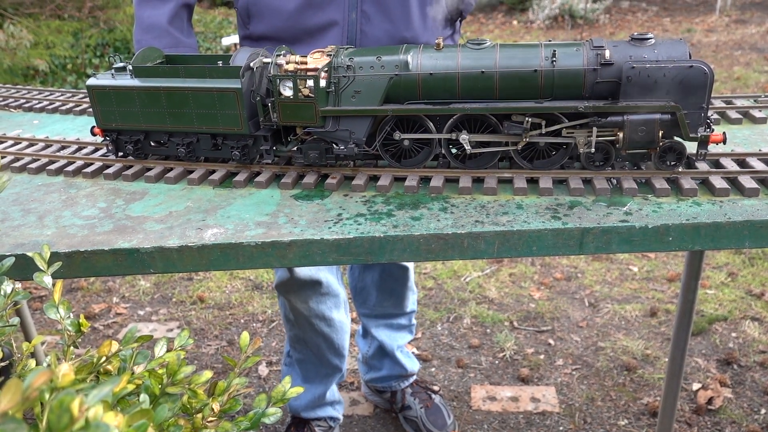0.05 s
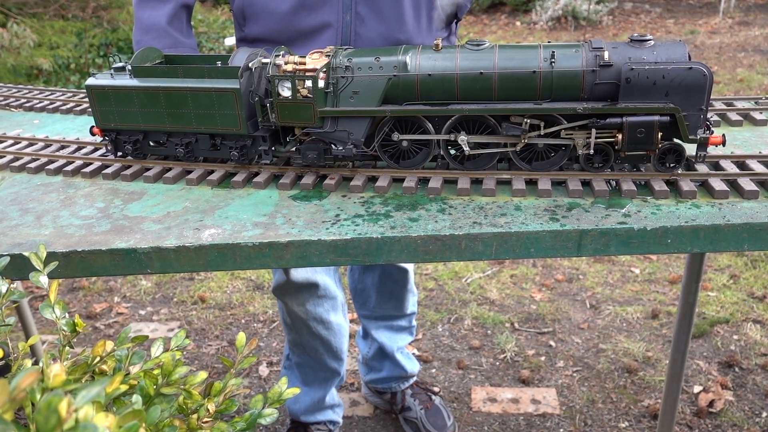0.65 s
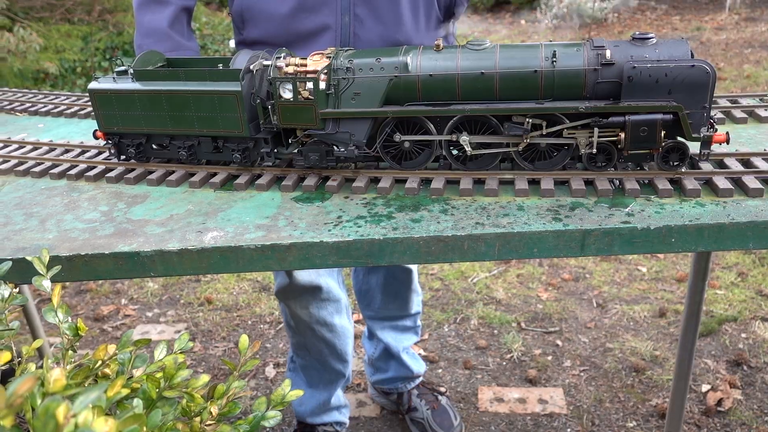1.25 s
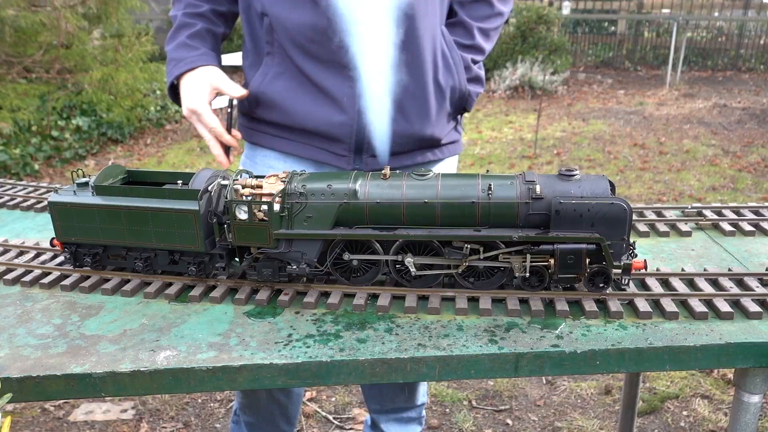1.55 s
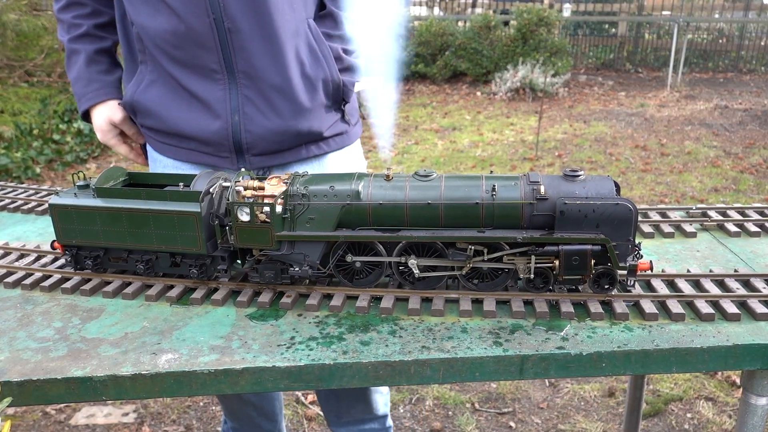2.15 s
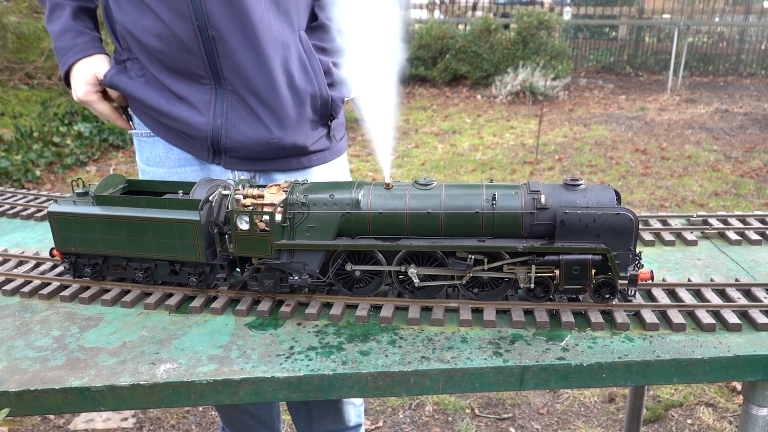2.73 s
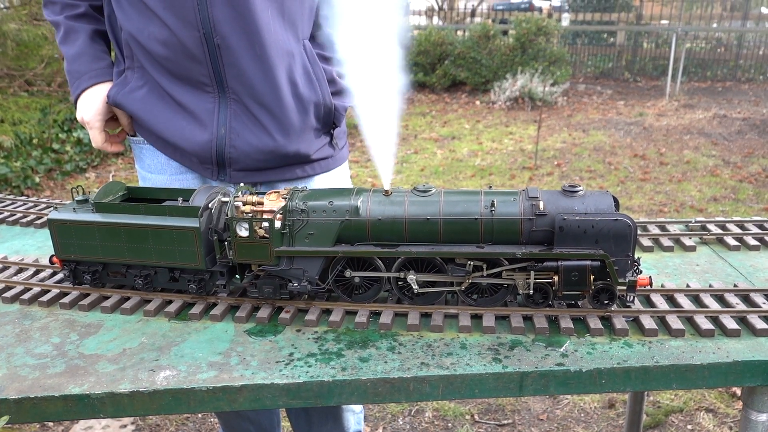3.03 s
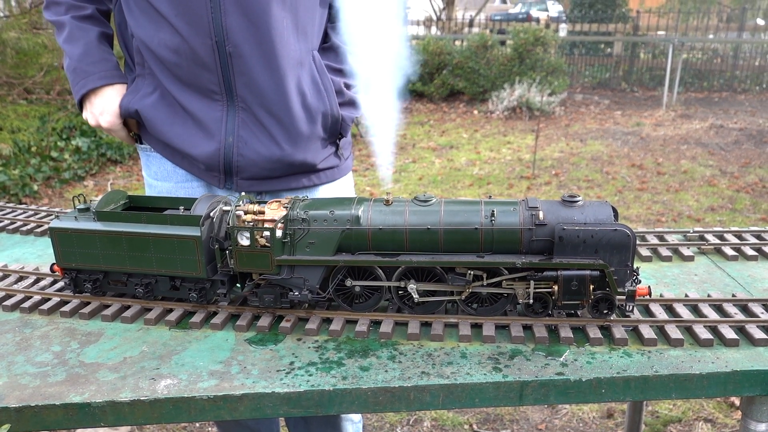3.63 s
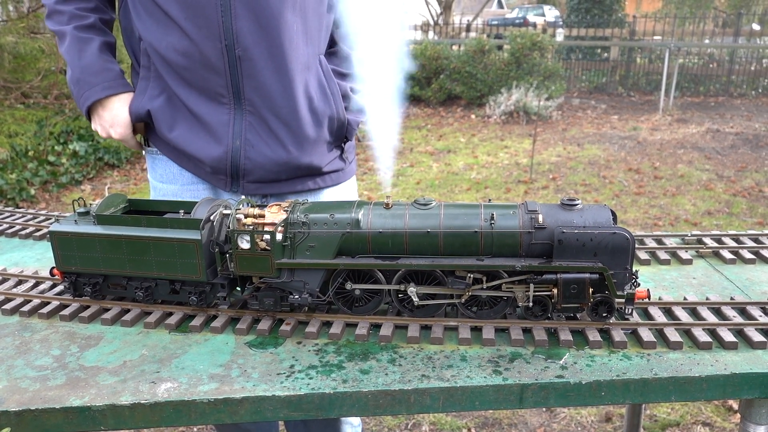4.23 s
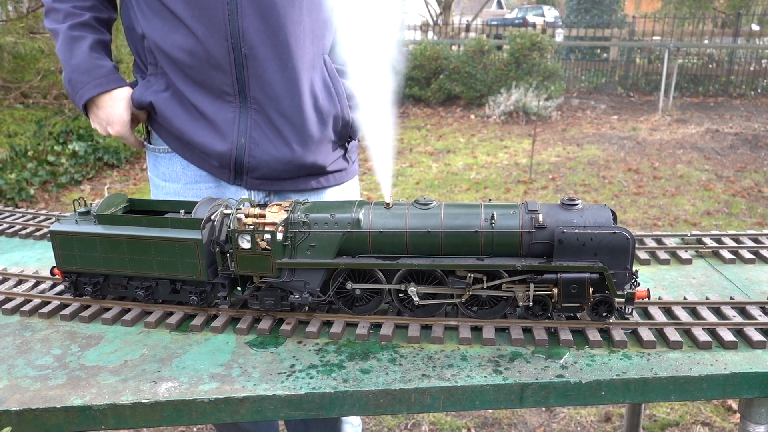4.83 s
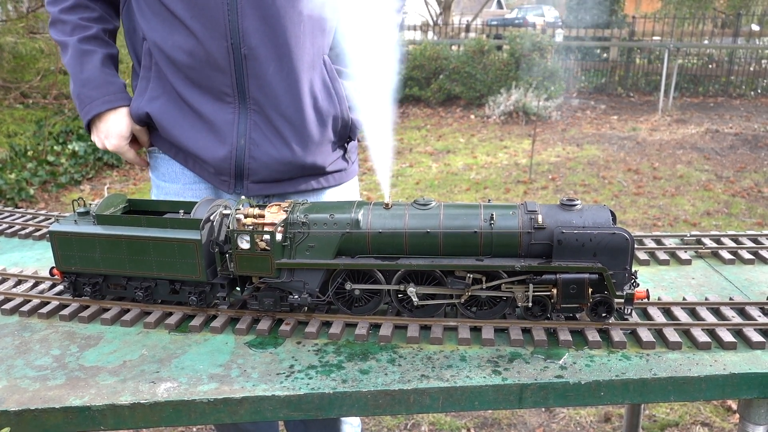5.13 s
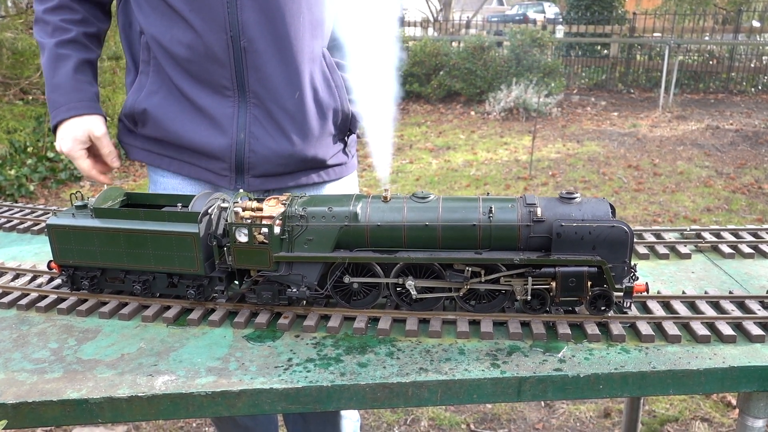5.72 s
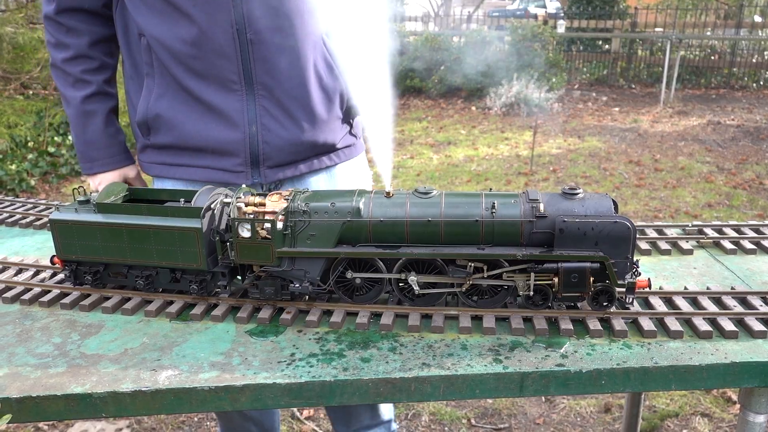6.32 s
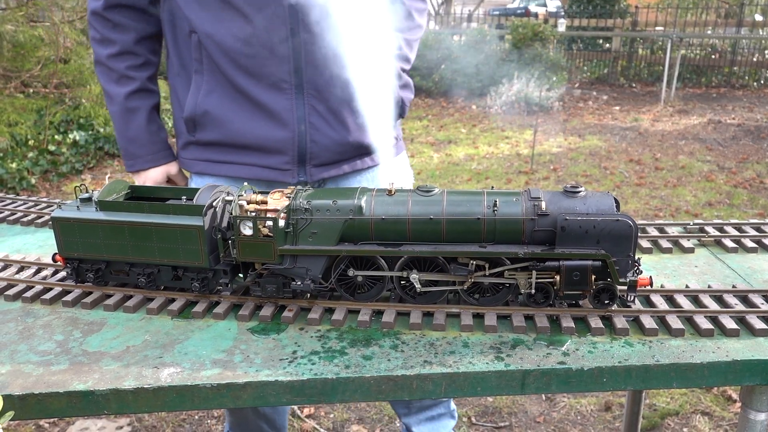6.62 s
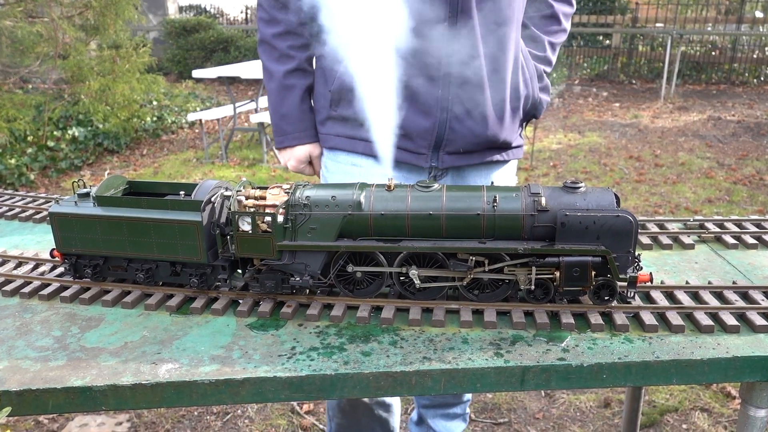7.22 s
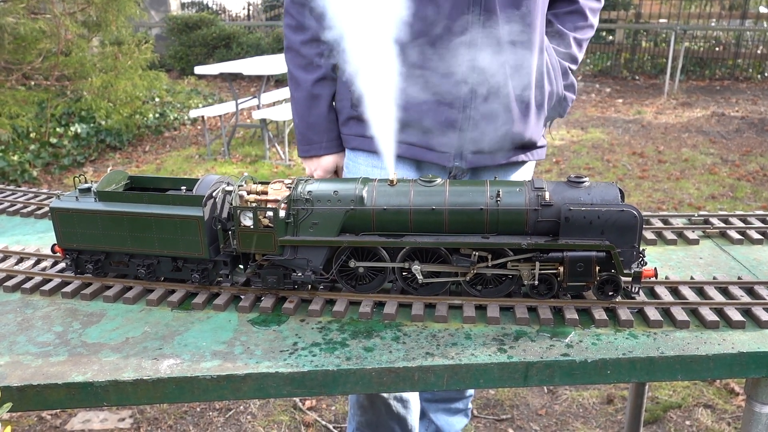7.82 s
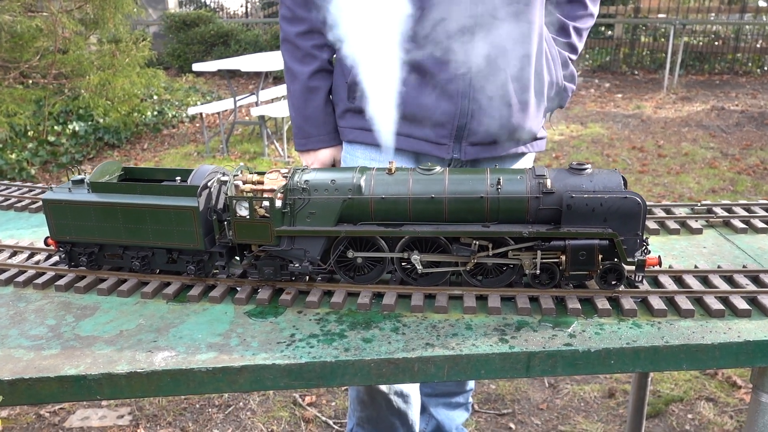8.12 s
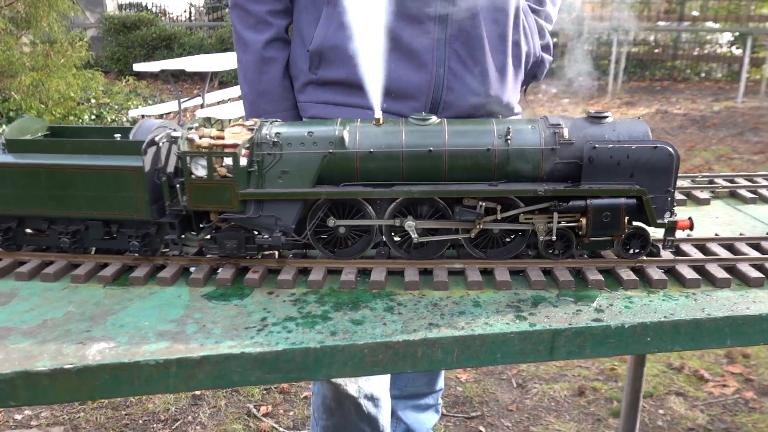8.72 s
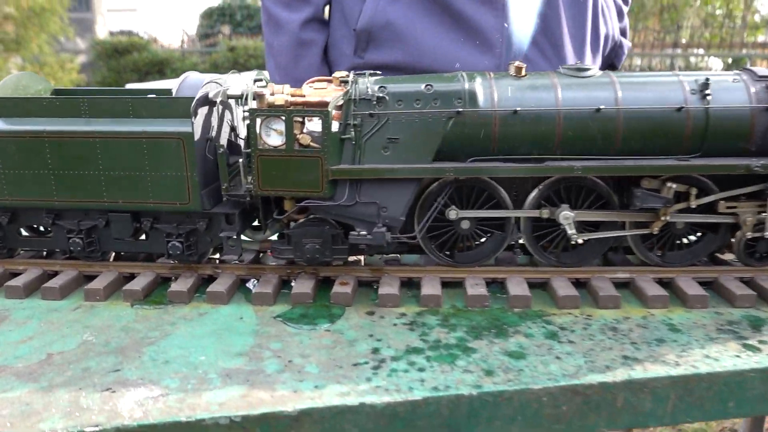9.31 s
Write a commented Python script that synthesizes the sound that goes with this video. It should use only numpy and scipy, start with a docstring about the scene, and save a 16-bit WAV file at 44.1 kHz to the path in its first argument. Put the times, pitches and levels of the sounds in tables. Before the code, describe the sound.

A model steam locomotive hisses softly, then its safety valve blows off in a loud, bright, pulsing jet that spits water.

```python
"""A live-steam model locomotive stands on a raised garden track, a little way from a stereo microphone.
First its blower hisses up the chimney over the murmur of the fire. At 1.6 s the level dips briefly,
and then the safety valve is blowing off: a bright, wet jet that spits drops of water. A fuller hiss
surges in about three times a second, evenly at first, slowing and stuttering from about 7 s.
Near the end the microphone moves in closer."""
import sys
import numpy as np
from scipy import signal
from scipy.fft import rfft, irfft, next_fast_len
from scipy.io import wavfile
from scipy.ndimage import uniform_filter1d, map_coordinates

SR = 44100
rng = np.random.default_rng(int(sys.argv[2]) if len(sys.argv) > 2 else 0)


def master_out(mix):
    """Clip the mix to full scale and print it as 16-bit PCM to the path in sys.argv[1]."""
    frames = np.transpose(np.atleast_2d(mix))
    ceiling = np.clip(frames, -1, 1)
    pcm = np.round(ceiling * 32767).astype(np.int16)
    wavfile.write(sys.argv[1], SR, pcm)


N = 417186
T = np.arange(N) / SR
DIP_S = 1.584  # the brief dip in level between blower and safety valve


def undb(db):
    """Decibels to gain."""
    return 10 ** (np.asarray(db) / 20)


def unit(x):
    """Scale to rms 1."""
    return x / np.sqrt(np.mean(x ** 2))


def curve(table):
    """A (t/s, value) table, sample by sample."""
    return np.interp(T, *np.transpose(table))


def highpass(x, hz, order=2):
    """Take away what lies below hz."""
    return signal.sosfilt(signal.butter(order, hz, "high", fs=SR, output="sos"), x)


def delay(x, lag_ms):
    """Hear a sound a little later; the lag may move."""
    return map_coordinates(x, [np.arange(N) - lag_ms * SR / 1000], order=3)


def colour(x, spectrum, resonances=()):
    """Causal filter: a (f/Hz, level/dB) spectrum with resonances standing on it."""
    size = next_fast_len(N + 8192, True)
    f = np.maximum(np.arange(size // 2 + 1) * SR / size, 1)
    hz, db = np.transpose(spectrum)
    peaks = 1 + sum(undb(level) ** 2 / (1 + 2 * ((f - centre) / width) ** 2) ** 2
                    for centre, width, level in resonances)
    gain = undb(np.interp(np.log(f), np.log(hz), db)) * np.sqrt(peaks)
    cepstrum = irfft(np.log(gain), size)
    cepstrum[1:size // 2] *= 2  # fold onto positive time for minimum phase
    cepstrum[size // 2 + 1:] = 0
    return irfft(rfft(x, size) * np.exp(rfft(cepstrum)), size)[..., :N]


def walk(rate_hz):
    """Random wavering of rms 1: values held for 1 / rate_hz seconds and smoothed twice."""
    hold = int(SR / rate_hz)
    held = rng.standard_normal(8192)[np.arange(N) // hold]
    return unit(uniform_filter1d(uniform_filter1d(held, hold), hold))


def turbulence(spectrum, resonances=(), *, apart_db):
    """Flow noise of rms 1 at the microphone's two ports: a shared part, and one each hears alone."""
    white = rng.standard_normal(N) + undb(apart_db) * rng.standard_normal((2, N))
    return unit(colour(white, spectrum, resonances))


def ripple(cycles):
    """The shape of a pressure wave only a few cycles long."""
    return lambda t, hz: -np.sin(2 * np.pi * hz * t) * np.exp(-(2 * hz * t / cycles) ** 2)


def shock(t, hz):
    """Pressure builds, snaps over into suction and relaxes."""
    return -np.tanh(t / 4e-5) * np.exp(-2 * np.pi * hz * np.abs(t))


def bursts(rows, shape):
    """Short pressure waves from (t/s, level/dB, f/Hz) rows; shape(t, hz) draws one around t = 0."""
    out = np.zeros(N)
    for s, db, hz in rows:
        middle, reach = int(s * SR), int(6 * SR / hz)
        i = np.arange(max(middle - reach, 0), min(middle + reach, N))
        wave = shape(T[i] - s, hz)
        out[i] += undb(db) * wave / (np.abs(wave).max() + 1e-9)
    return out


def spray(count, span_s, db, spread_db, hz, octaves):
    """Random (t/s, level/dB, f/Hz) rows: many small drops and a few larger ones."""
    when, size, pitch = rng.random((count, 3)).T
    times = span_s[0] + when * (span_s[1] - span_s[0])
    levels = db + spread_db * np.minimum(-np.log(1 - size), 4)
    return np.column_stack([times, levels, hz * 2 ** (octaves * (2 * pitch - 1))])


def garden_scatter(x, level_db=-16, t60_s=0.058):
    """Track bed and garden scatter back a short diffuse tail, unrelated at the two ports."""
    t = T[:SR // 10]
    tail = rng.standard_normal((2, len(t))) * np.exp(-np.log(1000) * t / t60_s)
    tail /= np.sqrt(np.sum(tail ** 2, axis=1, keepdims=True))
    return signal.fftconvolve(x[None], tail, axes=1)[:, :N] * undb(level_db)


# a hum coming and going behind the blower: t/s, level/dB
HUM_LEVEL = [(0, -64), (.15, -57), (.55, -57), (.7, -67), (1.3, -68), (1.45, -55)]

def hum():
    """A faint low tone in the background, wavering in pitch and level."""
    pitch_hz = 183 + 7 * walk(30)
    return np.sin(2 * np.pi * np.cumsum(pitch_hz) / SR) * undb(curve(HUM_LEVEL) + 2.5 * walk(14))


# low knocks: t/s, level/dB, f/Hz
SOFT_BUMPS = [(.812, -34.5, 185), (1.86, -28, 603), (2.16, -48, 190), (3.29, -41, 240)]

def bumps():
    """A few soft, dull bumps, alike at both ports."""
    return bursts(SOFT_BUMPS, ripple(cycles=1.3))


# spectrum of the fire's murmur: f/Hz, level/dB
FIRE_SPECTRUM = [(15, -64), (25, -43), (133, -14.5), (173, -19), (211, -7), (474, 0), (541, -2), (608, 2.5),
                 (753, 2.5), (889, -6), (981, -3.5), (1070, -37), (1300, -10), (1690, -32), (2860, -120)]

def fire(level_db=-42.5):
    """The draught murmurs steadily through the fire and tubes."""
    waver_db = 0.7 * walk(9)
    return turbulence(FIRE_SPECTRUM, apart_db=-24) * undb(level_db + waver_db)


# strength of the blower: t/s, level/dB
BLOWER_LEVEL = [(0, -22.5), (.3, -24), (.8, -23.5), (1.07, -22.5), (1.28, -24.5), (1.56, -23.5)]
# spectrum of its hiss: f/Hz, level/dB
BLOWER_SPECTRUM = [(200, -39), (1000, -10.5), (2000, -9.5), (3500, -5.5), (4500, 0), (6500, 0.5),
                   (8000, -3.5), (10000, -4.5), (11800, -4), (13700, -14), (15000, -5), (16000, -25)]
# resonances of blower and chimney: f/Hz, width/Hz, level/dB relative to the hiss
CHIMNEY_MODES = [(4770, 220, 1), (5450, 350, 7), (5740, 270, 13.5), (6200, 300, -1)]
# one sharp wet tick and two softer ones: t/s, level/dB, f/Hz
WET_TICKS = [(.356, -4.2, 8500), (1.07, -12, 9000), (1.461, -13, 3400)]
# shading of the blower at the left port: f/Hz, level/dB
LEFT_SHADE_BLOWER = [(300, -5), (1800, -1.5), (2900, -2.5), (3700, -2), (5200, -7), (6300, -6.5),
                     (7700, -2), (9000, -1), (12000, -3), (14000, 1)]

def blower():
    """A thin jet rings the chimney and water in the steam ticks; the left port is shaded and late."""
    hiss = turbulence(BLOWER_SPECTRUM, CHIMNEY_MODES, apart_db=-4.5)
    hiss *= undb(curve(BLOWER_LEVEL) + 0.9 * walk(69.9))
    fine = spray(90, (0, DIP_S), db=-19.5, spread_db=1.8, hz=6500, octaves=0.8)
    coarse = spray(12, (0, DIP_S), db=-12.5, spread_db=1.3, hz=8100, octaves=0.25)
    ticks = bursts(WET_TICKS, ripple(cycles=2.3)) + bursts([*fine, *coarse], ripple(cycles=0.7))
    left, right = hiss + ticks
    return np.array([delay(colour(left, LEFT_SHADE_BLOWER), lag_ms=0.029), right])


# the largest drops bursting in the valve's jet: t/s, level/dB, corner f/Hz
BIG_DROPS = [(1.814, -10, 2380), (2.282, -11.5, 800), (2.924, -6, 2800), (3.372, -8.5, 2600),
             (3.634, -8.5, 2200), (3.701, -12.5, 800), (5.142, -13, 700), (5.668, -16, 700),
             (6.147, -12, 1800), (6.24, -9, 2600), (6.639, -15, 700), (6.695, -18.5, 600), (6.74, -17, 500),
             (6.944, -7, 2000), (7.064, -13, 1000), (7.849, -10.5, 1500), (8.185, -7, 2000),
             (8.213, -9, 2000), (8.478, -8, 3000), (8.665, -12.5, 700), (8.846, -7, 2800),
             (8.977, -11, 1000), (9.007, -10, 1400), (9.116, -19, 500), (9.221, -11.5, 900),
             (9.399, -5, 2840)]

def drops(closeness, near_db=3, gush_db=2):
    """Water carried over with the steam bursts: big pops over gushes of small ones, louder close up."""
    span_s = (DIP_S, N / SR)
    crackle = spray(600, span_s, db=-22.5, spread_db=2.2, hz=2400, octaves=0.61)
    spits = spray(30, span_s, db=-14, spread_db=0.5, hz=3800, octaves=0.5)
    plops = spray(40, span_s, db=-28, spread_db=1.6, hz=650, octaves=0.6)
    small = bursts([*crackle, *spits, *plops], shock) * undb(near_db * closeness + gush_db * walk(14))
    return highpass(bursts(BIG_DROPS, shock) + small, 435)


def beats(first_s, gap_s, slowing, count):
    """Times of a beat whose every gap is longer than the last by the share `slowing`."""
    return first_s + np.append(0, np.cumsum(gap_s * (1 + slowing) ** np.arange(count - 1)))


# spectrum of the surging hiss: f/Hz, level/dB
SURGE_SPECTRUM = [(500, -69.5), (1200, -21.5), (2000, -6.5), (3000, -1.5), (4000, 0.5), (5500, 0.5),
                  (7000, -1), (8000, -4.5), (10000, -1.5), (12000, -8.5), (15500, -13)]
# its resonance: f/Hz, width/Hz, level/dB relative to the hiss
OUTLET_MODE = [(3970, 260, 1.5)]
# stutters of steam between and on top of the surges: middle t/s, length/s, level/dB
STEAM_STUTTERS = [(1.893, 0.089, -23.5), (5.706, .035, -22), (6.66, 0.2, -24), (7.321, .05, -21),
                  (7.79, 0.055, -21.5), (7.946, 0.049, -20), (8.13, 0.055, -20), (8.598, 0.22, -22.5),
                  (8.785, 0.12, -18), (9.137, 0.084, -21.5)]

def surges(level_db=-20.2, rise_s=0.024, fall_s=0.045, even_length_s=0.17, slower_length_s=0.13):
    """A fuller hiss rises quickly, holds and falls away: evenly at first, then slowing and stuttering."""
    even = beats(first_s=1.693, gap_s=0.3553, slowing=0, count=14)
    slower = beats(first_s=6.795, gap_s=0.326, slowing=0.093, count=7)
    rows = [(s, length, level_db + 0.6 * rng.standard_normal())
            for times, length in [(even, even_length_s), (slower, slower_length_s)] for s in times]
    opening = np.zeros(N)
    for s, length, db in [*rows, *STEAM_STUTTERS]:
        rising = (T - s + length / 2) / rise_s
        falling = (s + length / 2 - T) / fall_s
        gate = np.clip(0.5 + np.minimum(rising, falling), 0, 1)
        opening = np.maximum(opening, undb(db) * gate)
    hiss = turbulence(SURGE_SPECTRUM, OUTLET_MODE, apart_db=-14.5)
    flutter_db = 0.75 * walk(55) + 0.32 * walk(14)
    return hiss * opening * undb(flutter_db)


# spectrum of the valve's jet and plume: f/Hz, level/dB
JET_SPECTRUM = [(25, -58), (80, -41), (130, -32), (185, -22.5), (300, -17.5), (600, -7.5), (1100, -6),
                (2000, -2.5), (3500, 2), (5500, 1), (7500, 1.5), (10000, 4.5), (13400, 3), (15600, -5)]
# hollow resonance in the plume: f/Hz, width/Hz, level/dB relative to the roar
PLUME_MODE = [(637, 98, -1.5)]

def valve_jet(closeness, jet_db=-20.5, fade_in_s=0.064, sizzle_fade_db_per_s=0.3):
    """A bright jet fades in just after the dip; its sizzle slowly wanes, its wider plume sputters."""
    fading_in = np.clip(1 - (T - DIP_S) / fade_in_s, 0, 1)
    level_db = jet_db + 2.1 * closeness - 7 * fading_in
    hiss = highpass(turbulence(JET_SPECTRUM, apart_db=-5.5), 1460)
    sizzle = turbulence([(12000, -43), (13500, -6), (14500, 1), (15600, 1), (17000, -40)], apart_db=-10)
    sizzle *= undb(-4.5 - sizzle_fade_db_per_s * (T - DIP_S) - 2.5 * closeness)
    plume = turbulence(JET_SPECTRUM, PLUME_MODE, apart_db=-5.5)
    left, right = signal.sosfilt(signal.butter(2, 1700, fs=SR, output="sos"), plume)
    roar = np.array([left, delay(right, lag_ms=0.22)])
    flutter_db = 0.59 * walk(13) + 0.88 * walk(130)
    sputter_db = 1.25 * walk(18) + 1.23 * walk(170)
    return (hiss + sizzle + roar * undb(sputter_db - 0.83)) * undb(level_db + flutter_db)


# the microphone's way in to the engine: t/s, closeness (0 standing back, 1 close up)
MIC_APPROACH = [(2.5, 0), (3.6, 0.16), (7.9, 0.18), (8.85, 0.35), (9.15, 0.9), (9.46, 1)]
# shading of the valve at the left port, standing back: f/Hz, level/dB
LEFT_SHADE_FAR = [(250, 0), (1000, -3.5), (1800, -1.5), (3000, -5.5), (4000, -8), (4600, -12), (5300, -1),
                  (6000, -2), (7000, -3), (7700, -23.5), (8300, -4.5), (10500, -0.5), (13000, -2.5),
                  (15500, 3.5)]
# the same, close up: f/Hz, level/dB
LEFT_SHADE_NEAR = [(250, 6), (1200, -4), (2700, -5.5), (3300, -3.5), (4600, -13.5), (5600, -1.5),
                   (7000, -7), (8400, -37), (10500, -7), (12500, -31), (15500, -6)]

def safety_valve(echo_gain=0.19):
    """Jet, surges and drops as the microphone nears: shaded left, an echo off the engine on the right."""
    closeness = curve(MIC_APPROACH)
    left, right = valve_jet(closeness) + surges() + drops(closeness)
    echo = delay(right, lag_ms=np.interp(closeness, [0, 1], [2.09, 2.45]))
    echo = highpass(echo, 4100, order=1)  # only short waves bounce off so small a body
    left = (1 - closeness) * colour(left, LEFT_SHADE_FAR) + closeness * colour(left, LEFT_SHADE_NEAR)
    left = delay(left, lag_ms=np.interp(closeness, [0, 1], [0.0064, 0.023]))
    left *= undb(-0.67 - 3 * closeness)
    return np.array([left, right - echo_gain * echo]) + garden_scatter(right)


def scene():
    """At the trackside: blower and fire, then the safety valve; the level dips briefly between them."""
    sound = np.where(T < DIP_S, blower() + fire() + hum(), safety_valve()) + bumps()
    dip = np.clip(np.abs(T - DIP_S) / 0.016, 0, 1) ** 2
    return sound * dip


def record(dry):
    """The recorder thins the deep bass and cuts the top."""
    top_cut = signal.ellip(12, 0.2, 80, 15720, fs=SR, output="sos")
    return signal.sosfilt(top_cut, highpass(dry, 55))


dry = scene()
out = record(dry)
master_out(out)
```